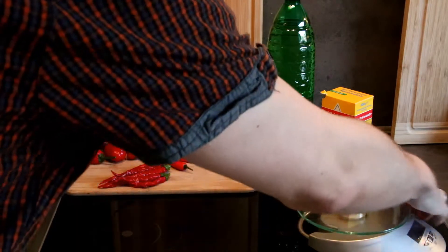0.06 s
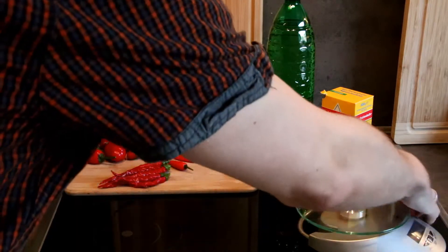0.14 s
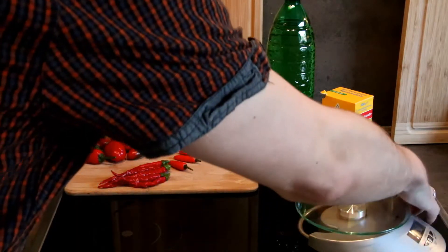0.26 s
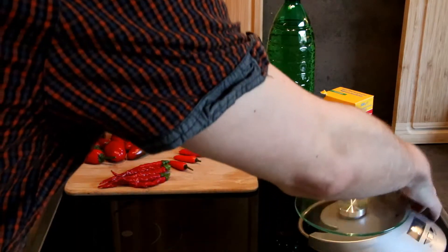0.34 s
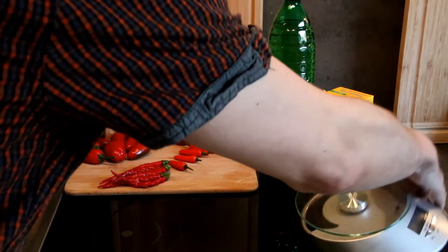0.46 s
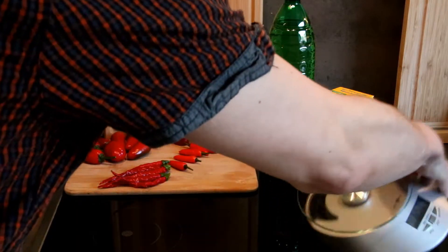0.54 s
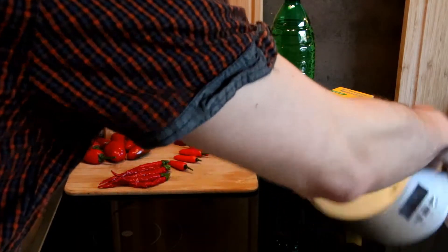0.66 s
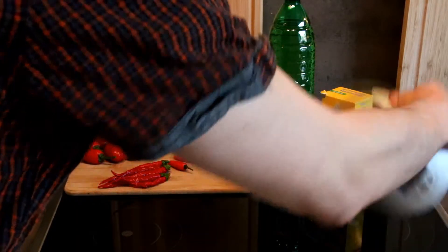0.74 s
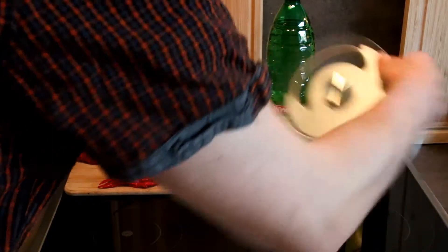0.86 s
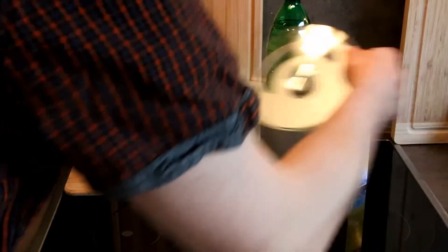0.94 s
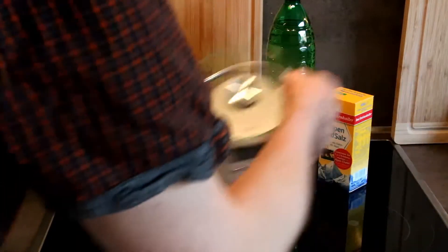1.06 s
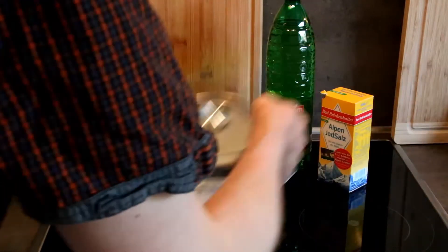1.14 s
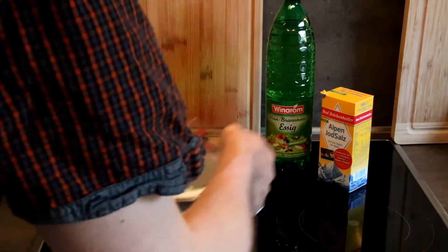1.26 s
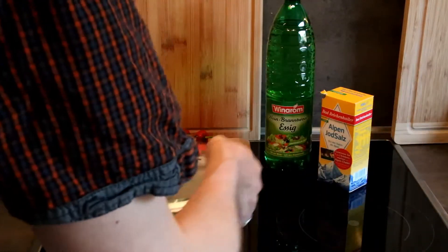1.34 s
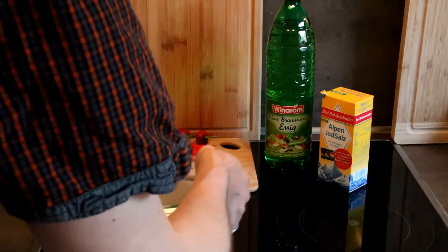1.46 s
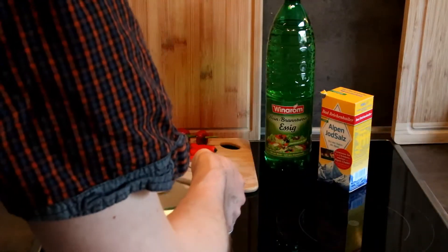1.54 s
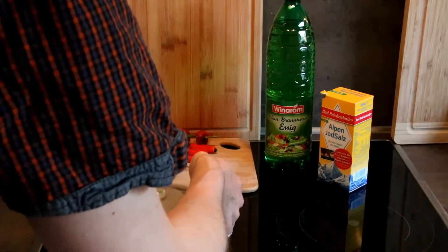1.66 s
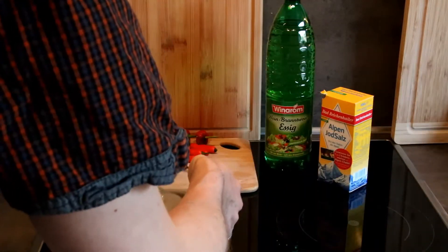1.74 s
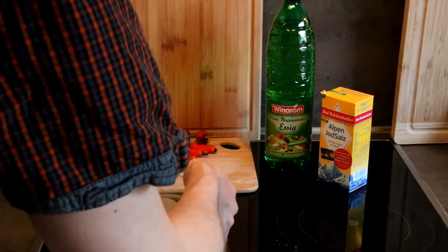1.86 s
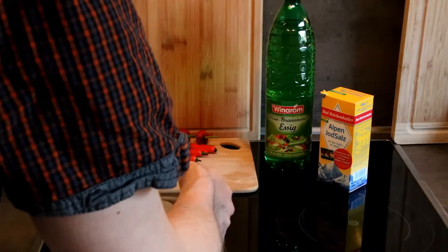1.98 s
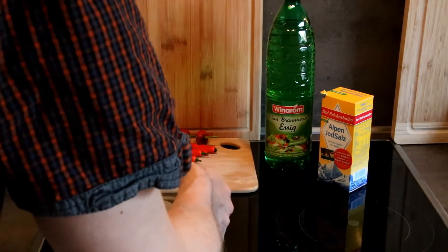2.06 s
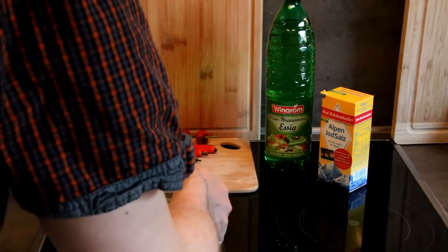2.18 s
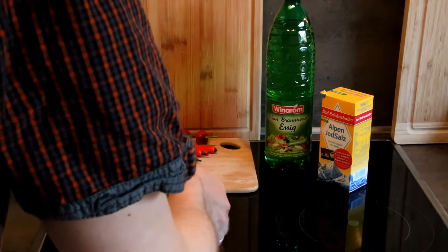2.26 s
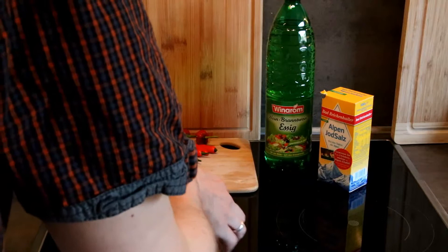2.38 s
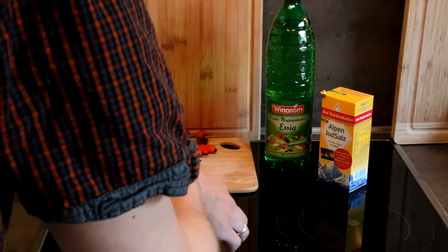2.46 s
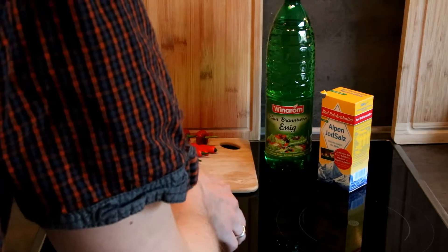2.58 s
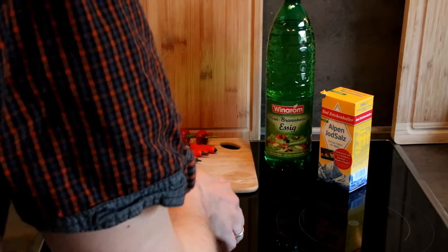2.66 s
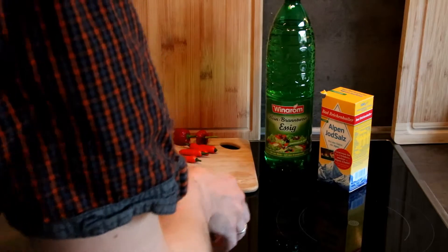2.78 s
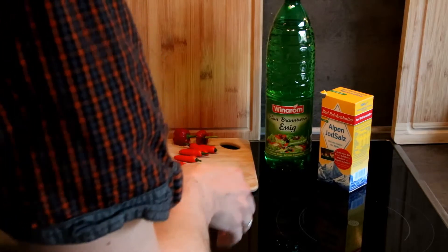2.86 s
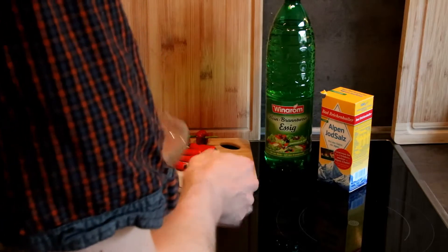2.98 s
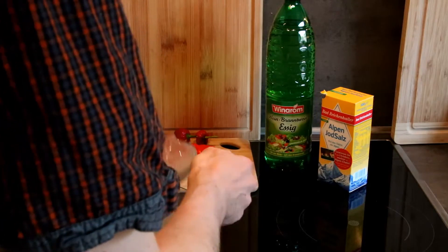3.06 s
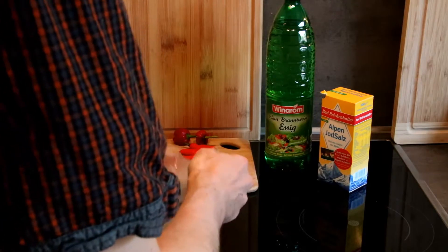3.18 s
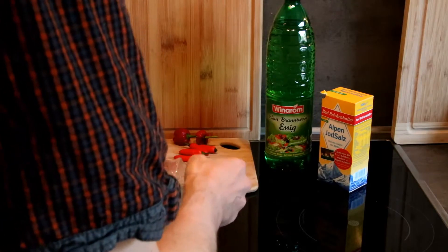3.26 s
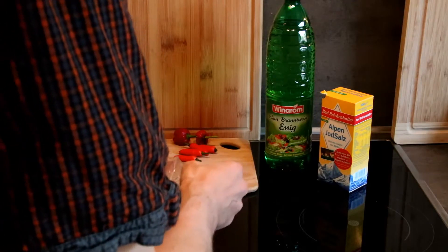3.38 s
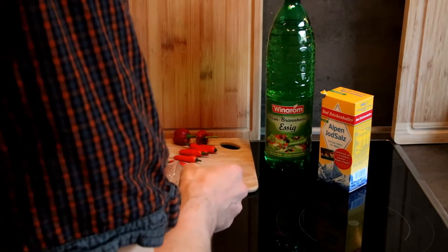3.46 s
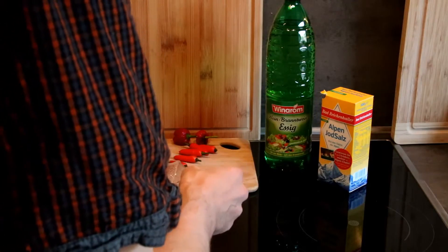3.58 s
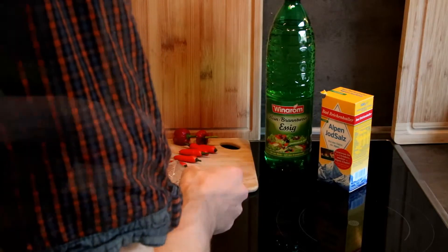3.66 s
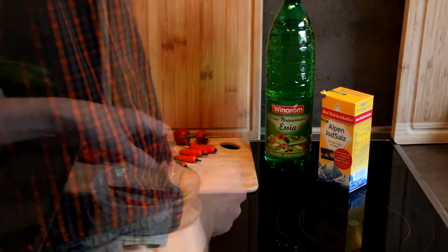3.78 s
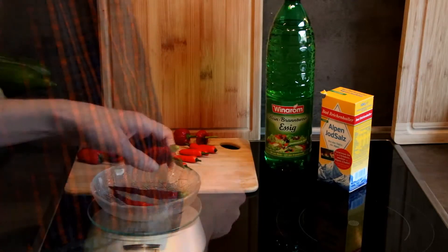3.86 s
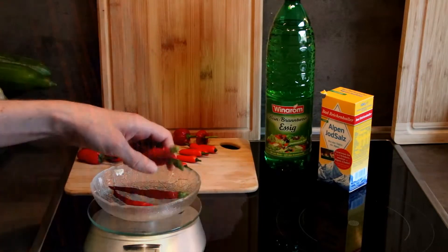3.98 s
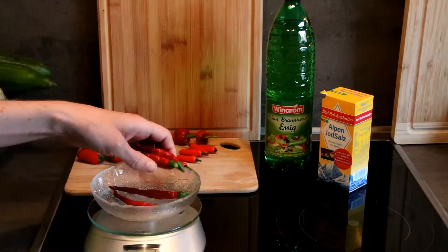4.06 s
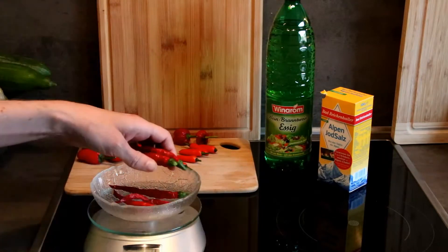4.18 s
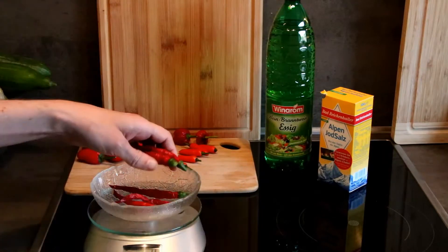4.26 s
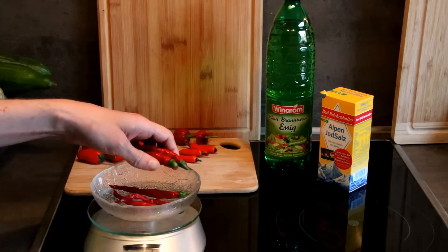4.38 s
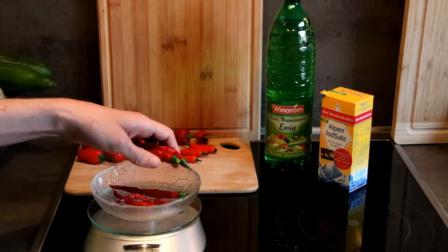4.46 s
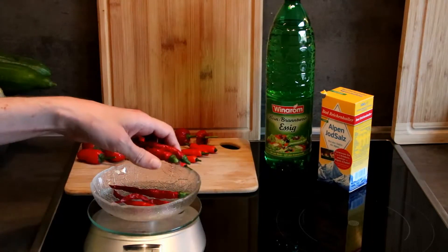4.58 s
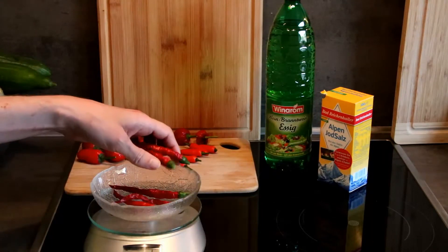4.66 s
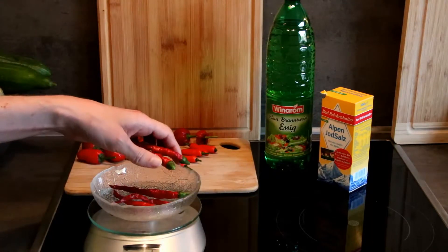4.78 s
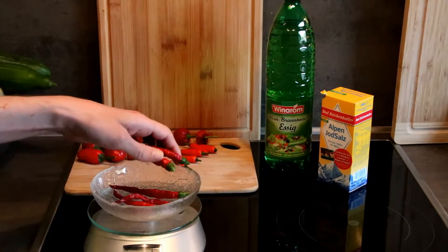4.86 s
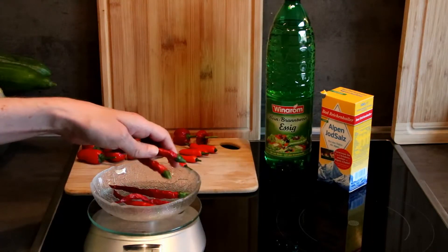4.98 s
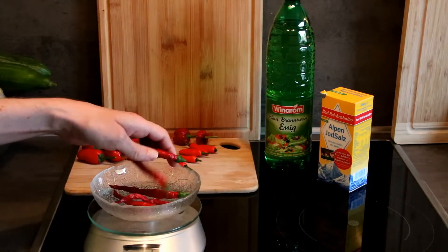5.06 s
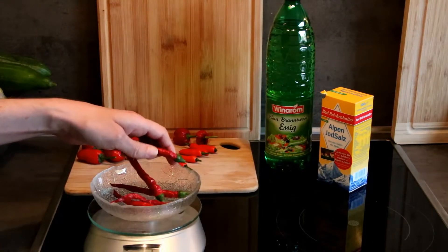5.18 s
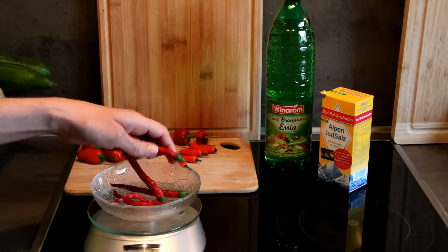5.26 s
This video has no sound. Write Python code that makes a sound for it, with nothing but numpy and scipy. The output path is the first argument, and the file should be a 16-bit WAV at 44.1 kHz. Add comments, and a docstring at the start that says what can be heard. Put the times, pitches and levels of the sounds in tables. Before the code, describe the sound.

Cloth brushes softly while a scale's glass plate clinks and its housing knocks. After a near-quiet gap it bumps and stutters across a glass hob, its last foot dropping with a sharp clack. About a second later a glass bowl hits the platter, the loudest sound, with quick lessening clinks. Then faint chili taps and finger rubs, heard close with a brief kitchen echo.

```python
"""A kitchen scale with a glass platter is lifted, carried over and set down on a glass hob, feet juddering.
A glass bowl clinks and rocks on the platter, then a fresh chili drops in among fainter taps and touches.
Blows ring decaying modes over a noise crack and a support thump; slips, scrapes and squeaks come from friction.
Cloth and fingers are coloured random grains; a small kitchen echoes briefly over a quiet hush."""
import sys
import numpy as np
from scipy import signal
from scipy.fft import rfft, irfft
from scipy.io import wavfile

SR = 44100
rng = np.random.default_rng(int(sys.argv[2]) if len(sys.argv) > 2 else 0)


def dump_mix(stems):
    """Bounce the given channels to the path in sys.argv[1] as a 16-bit WAV at rate SR."""
    frames = np.atleast_2d(stems).T  # one column per channel
    limited = np.clip(frames, -1, 1)  # hard clip at full scale
    pcm = np.round(limited * 32767).astype(np.int16)
    wavfile.write(sys.argv[1], SR, pcm)


N = 234727
TIME_S = np.arange(N) / SR
RING_TIME_S = TIME_S[:SR]

# Event tables; contact_hz is contact brightness, a low-pass cutoff
# arm movements brushing the sleeve over the shirt: peak_s, level_db, rise_s
SLEEVE_STROKES = [(0.081, -67.5, 0.42), (0.558, -60.5, 0.04), (.95, -61, 0.13), (1.241, -69.5, .07),
                  (2.0, -71, .15), (2.81, -58, 0.069), (2.96, -59, 0.068), (3.2, -69, .05),
                  (5.22, -72.5, .09)]
# platter knocks during handling: start_s, level_db, contact_hz, counter_thump_db
PLATTER_KNOCKS = [(.188, -53, 1470, -57), (.572, -32.5, 1170, -63), (.5975, -23, 8260, -47),
                  (.833, -42, 1240, -63), (1.020, -48.5, 7000, -63), (3.077, -46, 1410, -58)]
# dull low knocks of the housing while handled, then bumps on the hob:
# start_s, level_db, contact_hz, counter_thump_db
HOUSING_KNOCKS = [(.321, -41.5, 5500, -45.5), (.5365, -27, 2800, -49), (1.513, -57.5, 900, -71),
                  (1.659, -43, 3980, -77), (1.909, -34, 2400, -74), (2.068, -66, 600, -41.5),
                  (2.130, -29.5, 1500, -46), (2.523, -38.5, 696, -55), (2.541, -25, 470, -62.5)]
# shoves along the hob: fastest_s, level_db, speed_up_s, slow_down_s, contact_hz
SHOVES = [(1.9393, -23, 0.006, 0.009, 11200), (2.194, -34, 0.0078, 0.0054, 1900),
          (2.2137, -23, 0.0043, 0.018, 1950), (2.354, -40.5, 0.05, 0.011, 2080)]
# feet squeaking on the glass: peak_s, level_db, pitch_hz
SQUEAKS = [(1.966, -61.5, 9350), (2.188, -72, 9200), (2.22, -62, 6020), (2.22, -71, 9260),
           (2.258, -62, 6040)]
# the scale's last foot dropping onto the hob: start_s, level_db, contact_hz, counter_thump_db
LAST_FOOT = [(2.5465, -17.5, 13030, -28.5)]
# bowl landing on the platter and rocking to rest: start_s, level_db, contact_hz, load_cell_thump_db
BOWL_HITS = [(3.4785, -9, 13900, -19.5), (3.534, -25, 9000, -47), (3.558, -24.5, 5000, -50),
             (3.601, -22, 12700, -52.5), (3.668, -31.5, 590, -45.5), (3.714, -35, 12800, -50),
             (3.748, -40, 14000, -46)]
# a chili dropping into the bowl, and fainter taps and touches: start_s, level_db, stalk_contact_hz
CHILI_TAPS = [(4.046, -62, 8880), (4.1466, -39, 12000), (4.976, -62, 3000), (5.1363, -57, 4400)]
# fingers rolling a chili free: peak_s, level_db, rise_s, fall_s
FINGER_RUBS = [(4.813, -56, 0.0025, 0.033), (4.88, -63, 0.015, 0.054)]

# Modes of each struck body: mode_hz, level_db, t60_s
PLATTER_MODES = [(490, -17.5, 0.085), (560, -12.5, 0.092), (736, -11, 0.19), (1066, -17, 0.087),
                 (1206, -19.5, 0.25), (1926, -17, 0.078), (1994, -15.5, 0.12), (2250, -23.5, 0.053),
                 (2920, -35.5, 0.18), (3584, -37, 0.05)]
HOUSING_MODES = [(254, -24, 0.13), (338, -12, 0.065), (467.6, -3.5, 0.064), (592.5, -5.5, 0.088),
                 (726, -20, 0.12), (983, -40, 0.012), (1074, -23.5, 0.12), (1435, -18.5, 0.034),
                 (3700, -29, 0.074), (6000, -35, 0.057), (6250, -22.5, 0.04), (9330, -21, 0.043),
                 (10400, -27.5, 0.054), (12200, -34, .04)]
HOB_MODES = [(249.5, -13, 0.12), (336, -20, 0.33), (400, -8, 0.045), (496, -8, 0.099), (557, -11.5, 0.15),
             (940, -28, 0.15), (1000, -13, 0.062), (1629.4, -14.5, 0.064), (1930, -5.5, 0.05),
             (2400, -18, 0.048), (3860, -36, .08), (4900, -17, 0.052), (6200, -20.5, 0.12),
             (10700, -37, 0.18)]
BOWL_MODES = [(380, -13.5, 0.06), (486, -0.5, 0.094), (556, -18, 0.31), (704, -5, 0.12), (1449, -1, 0.066),
              (1468, -14, 0.2), (1620, -22.5, 0.37), (1690, -20, 0.14), (1816, -13.5, 0.076),
              (1980, -18.5, 0.028), (2340, -23, 0.35), (2992, -18, 0.027), (3575, -20, 0.082),
              (3840, -21.5, 0.066), (4020, -20, 0.098), (4300, -26.5, 0.23), (5440, -22.5, 0.094),
              (6400, -19.5, 0.079), (6614, -19.5, 0.057), (9485, -29.5, 0.18), (10250, -23.5, 0.11),
              (13000, -32.5, .13), (14030, -35.5, .12)]
FILLED_BOWL_MODES = [(484, -4, 0.13), (702, -7, 0.1), (995, -11.5, 0.3), (1210, -12, 0.12),
                     (2325, -13.5, 0.078), (3780, -23.5, 0.13), (4150, -15.5, 0.066), (5980, -21, 0.12),
                     (10696, -26, 0.15), (12200, -24, 0.09)]
# Modes of what gives way under a blow, the counter or the sprung load cell: mode_hz, level_db, t60_s
COUNTER_MODES = [(64, -9, 0.077), (88.7, -1.5, 0.0764), (105, -17.5, 0.73), (138.5, -9, 0.11)]
LOAD_CELL_MODES = [(30.2, 1, 0.052), (65, 1, 0.051), (102.6, -21.5, 0.94), (112, -8, 0.074)]

# Cracks, the crowded damped modes of each body: freq_hz, relative_density_db (per Hz)
PLATTER_CRACK = [(120, -4), (260, -16.5), (450, -0.5), (800, 4.5), (1100, -3), (1900, -5), (3000, -15.5),
                 (6500, -23.5), (11000, -29.5), (15000, -21)]
HOUSING_CRACK = [(100, -15.5), (220, -3), (450, 2), (1000, -1), (1600, -13.5), (2600, -22.5), (6000, -29),
                 (9000, -36.5), (15000, -38)]
HOB_CRACK = [(60, 5), (150, -3.5), (450, 1.5), (750, -16.5), (1100, 0), (2000, -4), (3000, -9.5),
             (6000, -12.5), (8000, -19.5), (12000, -29), (15500, -34.5)]
BOWL_CRACK = [(120, -14.5), (220, -19.5), (420, -3.5), (650, -1.5), (850, -9), (1150, -5.5), (1600, -5.5),
              (2600, -17), (3800, -7.5), (4700, -24), (6500, -17), (8500, -30), (15000, -40)]
CHILI_CRACK = [(120, -4), (500, -1.5), (1100, 1), (1600, -6.5), (4000, -9), (7000, -13), (10000, -18.5),
               (15000, -27)]
# Spectra of the quiet kitchen, sleeve and fingers: freq_hz, relative_density_db (per Hz)
HUSH_COLOUR = [(35, -19), (100, -8.5), (200, -10.5), (280, -5), (420, -11), (900, -13.5), (2850, -24),
               (3830, -28), (11800, -37), (15000, -56.5)]
SLEEVE_COLOUR = [(60, -3), (250, -0.5), (550, 0.5), (1200, -6.5), (2500, -10), (4500, -18), (7000, -25.5),
                 (11000, -30.5), (15000, -38)]
FINGER_COLOUR = [(60, -25), (250, 1.5), (400, -5), (800, -8.5), (1200, -18.5), (3200, -25.5), (4000, -34.5),
                 (12000, -55), (15500, -65)]
# Kitchen echo: freq_hz, t60_s, level_db
KITCHEN_ECHO = [(100, 0.2, -2.5), (280, 0.81, -7), (502, 0.38, -8.5), (1407, 0.65, -9.5),
                (3270, 0.57, -5.5), (6200, 0.31, -6), (14000, 0.36, -11)]

HUSH_DB = -70
SLIP_EVERY_S, SLIP_JITTER_S = .0095, 0.00041
SLIP_THUMP_DB = -25.5   # re each slip
SCRAPE_RING_DB, SCRAPE_GRIT_DB = -14, -13.5   # re the shove level
SCRAPE_RING_HZ = 5000   # low-pass cutoff
SCRAPE_LONGER = 1.27   # scrape rise and fall times, as a multiple of the shove's
SQUEAK_RISE_S, SQUEAK_FALL_S, SQUEAK_WIDTH_HZ = 0.0092, 0.0067, 170
FLESH_BRIGHTNESS = 0.15   # share of the stalk's contact_hz
STALK_AFTER_S, STALK_DB = .0115, -2   # re the flesh contact
BOUNCE_AFTER_S, BOUNCE_DB = .0465, -8.5   # re the flesh contact
POD_THUMP_DB = -10.5   # re each contact
DIP_S, DIP_DB, DIP_SINK_S, DIP_RECOVER_S = 4.0, -7, 0.052, 0.076
MICROPHONE_LOW_HZ, CUTOFF_HZ = 30.1, 15700


def from_db(db):
    """Decibels to gain."""
    return 10 ** (np.asarray(db) / 20)


def rms_one(x):
    """Scale to unit power."""
    return x / np.sqrt(np.mean(x ** 2))


def at_hz(rows, hz, axis=1):
    """Read one table column, interpolated over log frequency."""
    rows = np.array(rows)
    return np.interp(np.log(hz + 1), np.log(rows[:, 0]), rows[:, axis])


def coloured(x, spectrum):
    """Give a steady signal a spectrum, rolled off in the deepest bass; rms 1."""
    hz = np.arange(len(x) // 2 + 1) * SR / len(x)
    bass_cut = hz ** 2 / (hz ** 2 + spectrum[0][0] ** 2 / 2)
    return rms_one(irfft(rfft(x) * from_db(at_hz(spectrum, hz)) * bass_cut, len(x)))


def low_pass(x, hz):
    """Take out treble, as a soft contact does to a blow."""
    sos = signal.butter(2, np.clip(hz, 20, .45 * SR), fs=SR, output="sos")
    return signal.sosfilt(sos, x + 1e-18)


def high_pass(x, hz):
    """Take out bass, as a small body radiates little of it."""
    return signal.sosfilt(signal.butter(2, hz, "high", fs=SR, output="sos"), x + 1e-18)


def band_pass(x, low_hz, high_hz):
    """Keep one frequency band."""
    return signal.sosfilt(signal.butter(2, [low_hz, high_hz], "band", fs=SR, output="sos"), x)


def swell(peak_s, level_db, rise_s, fall_s, time_s=TIME_S):
    """Gain of one movement: rounded top at peak_s; rise and fall are time constants."""
    away = np.abs(time_s - peak_s) / np.where(time_s < peak_s, rise_s, fall_s)
    return from_db(level_db) / np.cosh(np.minimum(away, 50))   # limit avoids overflow


def grains(per_s, spread_db):
    """Tiny random slips of uneven size and either sign; rms 1."""
    occurs = rng.random(N) < per_s / SR
    sign = rng.choice([-1, 1], N)
    size = from_db(spread_db * np.clip(rng.standard_normal(N), -2, 2))
    return rms_one(occurs * sign * size)


def ringing(modes):
    """All modes struck at once; little is radiated below the lowest one."""
    ring = np.zeros(SR)
    for k, (hz, level_db, t60_s) in enumerate(modes):
        decay = from_db(level_db - 60 * RING_TIME_S / t60_s)
        ring += (-1) ** k * decay * np.sin(2 * np.pi * hz * RING_TIME_S)
    return high_pass(ring, modes[0][0] / 2)


def split_ringing(modes, split, twin_db, vary_db):
    """Each mode has close twins whose pitch depends on how the body rests, so the ring beats unevenly."""
    out = np.zeros(SR)
    for k, (hz, level_db, t60_s) in enumerate(modes):
        t = RING_TIME_S[:round(1.3 * t60_s * SR)]
        detune = split * rng.standard_normal((3, 1))
        phase = rng.uniform(0, 2 * np.pi, (3, 1))
        main = (-1) ** k * np.sin(2 * np.pi * hz * t)
        twins = np.sin(2 * np.pi * hz * (1 + detune) * t + phase).sum(axis=0)
        twin_gain = from_db(twin_db) * np.sqrt(hz / (hz + 1000))   # weaker at low pitch
        decay = from_db(level_db + vary_db * rng.standard_normal() - 60 * t / t60_s)
        out[:len(t)] += decay * (main + twin_gain * twins)
    return out


def add(out, start_s, sound):
    """Mix a sound in at start_s."""
    start = round(start_s * SR)
    out[start:start + len(sound)] += sound[:N - start]


def blows(hits, modes, crack, support, crack_db, crack_t60_s, rise_s, twin_db, edge_db):
    """Each blow rings the modes with strengths of its own, over a short crack, and thumps the support."""
    out, thump = np.zeros(N), ringing(support)
    # each blow swells in over a few milliseconds, as early reflections arrive
    swell_in = 1 - np.exp(-(RING_TIME_S / rise_s) ** 2)
    crack_decay = from_db(crack_db - 60 * RING_TIME_S / crack_t60_s)
    for start_s, level_db, contact_hz, thump_db in hits:
        tone = split_ringing(modes, split=.02, twin_db=twin_db, vary_db=1.4)
        burst = coloured(rng.standard_normal(SR), crack) * crack_decay
        body = low_pass(swell_in * (tone + burst), contact_hz)
        edge = from_db(edge_db) * low_pass(swell_in * burst, 5800)   # even a soft contact has a hard edge
        radiated = high_pass(body - edge, 90)
        add(out, start_s, from_db(level_db) * radiated + from_db(thump_db) * thump)
    return out


def hush():
    """Quiet kitchen: steady coloured noise."""
    return from_db(HUSH_DB) * coloured(rng.standard_normal(N), HUSH_COLOUR)


def sleeve():
    """Threads of cloth catch on each other with every stroke of the arm; strokes add in power."""
    power = sum(swell(peak_s, level_db, rise_s, rise_s) ** 2 for peak_s, level_db, rise_s in SLEEVE_STROKES)
    return np.sqrt(power) * coloured(grains(per_s=6500, spread_db=3.5), SLEEVE_COLOUR)


def kitchen_echo(x, build_s):
    """Diffuse echo that builds up, then dies away at its own rate in each band."""
    edges_hz, echo = np.geomspace(45, 17000, 10), np.zeros(SR)
    build = 1 - np.exp(-(RING_TIME_S / build_s) ** 2)
    for low_hz, high_hz in zip(edges_hz, edges_hz[1:]):
        hz = np.sqrt(low_hz * high_hz)
        decay = from_db(-60 * RING_TIME_S / at_hz(KITCHEN_ECHO, hz))
        band = band_pass(rng.standard_normal(SR), low_hz, high_hz) * decay * build
        band_gain = from_db(at_hz(KITCHEN_ECHO, hz, axis=2)) * np.sqrt(2 * (high_hz - low_hz)) / SR
        echo += band_gain * rms_one(band)
    return signal.fftconvolve(x, echo)[:N]


def platter_knocks():
    """The glass platter knocks as the scale is handled."""
    return blows(PLATTER_KNOCKS, PLATTER_MODES, PLATTER_CRACK, COUNTER_MODES,
                 crack_db=-2.5, crack_t60_s=0.066, rise_s=0.0031, twin_db=-5, edge_db=-18.0)


def judder(count=8):
    """Stick and slip: the faster the shove, the stronger and brighter the slip; returns blow rows."""
    slips = []
    for fastest_s, level_db, rise_s, fall_s, contact_hz in SHOVES:
        even_s = SLIP_EVERY_S * (np.arange(count) - count // 2 + 1)
        times_s = fastest_s + even_s + SLIP_JITTER_S * rng.standard_normal(count)
        speeds = swell(fastest_s, 0, rise_s, fall_s, times_s)   # re the fastest
        for slip_s, speed in zip(times_s, speeds):
            slip_db = level_db + 20 * np.log10(speed)
            slips.append((slip_s, slip_db, contact_hz * np.sqrt(speed), slip_db + SLIP_THUMP_DB))
    return slips


def housing_knocks():
    """Dull low knocks of the housing while handled, then bumps on the hob and juddering slips of the feet."""
    return blows(HOUSING_KNOCKS + judder(), HOUSING_MODES, HOUSING_CRACK, COUNTER_MODES,
                 crack_db=-1.5, crack_t60_s=.05, rise_s=0.0025, twin_db=-5.5, edge_db=-14)


def scrape():
    """The sliding feet grind over the hob and keep the housing ringing."""
    sliding = sum(swell(fastest_s, level_db, SCRAPE_LONGER * rise_s, SCRAPE_LONGER * fall_s)
                  for fastest_s, level_db, rise_s, fall_s, _ in SHOVES)
    driven = signal.fftconvolve(grains(per_s=290, spread_db=13.5), ringing(HOUSING_MODES))[:N]
    ring = rms_one(low_pass(driven, SCRAPE_RING_HZ))
    grit = coloured(grains(per_s=7200, spread_db=11.5), HOUSING_CRACK)
    return sliding * (from_db(SCRAPE_RING_DB) * ring + from_db(SCRAPE_GRIT_DB) * grit)


def squeaks():
    """Friction briefly excites one narrow, high resonance: band-passed noise."""
    out = np.zeros(N)
    for peak_s, level_db, hz in SQUEAKS:
        tone = band_pass(rng.standard_normal(N), hz - SQUEAK_WIDTH_HZ / 2, hz + SQUEAK_WIDTH_HZ / 2)
        out += swell(peak_s, level_db, SQUEAK_RISE_S, SQUEAK_FALL_S) * rms_one(tone)
    return out


def last_foot():
    """The scale's last foot drops onto the hob and rings its glass."""
    return blows(LAST_FOOT, HOB_MODES, HOB_CRACK, COUNTER_MODES,
                 crack_db=-4.5, crack_t60_s=0.069, rise_s=0.0013, twin_db=-4.5, edge_db=-30.5)


def bowl():
    """Glass meets glass, then rocks; the load cell gives way."""
    return blows(BOWL_HITS, BOWL_MODES, BOWL_CRACK, LOAD_CELL_MODES,
                 crack_db=-0.5, crack_t60_s=0.058, rise_s=0.0028, twin_db=-3.5, edge_db=-31)


def chili_taps():
    """A chili drop and fainter touches: each taps with soft flesh, then the hard stalk, and bounces once."""
    # after_s, relative_db, brightness share
    contacts = ((0, 0, FLESH_BRIGHTNESS), (STALK_AFTER_S, STALK_DB, 1), (BOUNCE_AFTER_S, BOUNCE_DB, 1))
    taps = []
    for start_s, level_db, contact_hz in CHILI_TAPS:
        for after_s, relative_db, brightness in contacts:
            tap_db = level_db + relative_db
            taps.append((start_s + after_s, tap_db, contact_hz * brightness, tap_db + POD_THUMP_DB))
    return blows(taps, FILLED_BOWL_MODES, CHILI_CRACK, COUNTER_MODES,
                 crack_db=0.0, crack_t60_s=0.082, rise_s=0.00045, twin_db=-1.5, edge_db=-46.0)


def finger_rubs():
    """Skin slips in tiny grains as the fingers roll a chili free."""
    rubbing = sum(swell(*rub) for rub in FINGER_RUBS)
    return rubbing * coloured(grains(per_s=1100, spread_db=2.5), FINGER_COLOUR)


def scene():
    """Handling and its echo, dipping briefly as the bowl dies away, over the steady hush."""
    scale = platter_knocks() + housing_knocks() + scrape() + squeaks() + last_foot()
    near = sleeve() + scale + bowl() + chili_taps() + finger_rubs()
    dip = from_db(DIP_DB * swell(DIP_S, 0, DIP_SINK_S, DIP_RECOVER_S))
    return (dip * (near + kitchen_echo(near, build_s=0.0099)) + hush())[None]


def record(dry):
    """The microphone drops the deepest bass; the top is cut steeply."""
    heard = signal.sosfilt(signal.butter(2, MICROPHONE_LOW_HZ, "high", fs=SR, output="sos"), dry)
    return signal.sosfilt(signal.ellip(10, .1, 80, CUTOFF_HZ, fs=SR, output="sos"), heard)


dry = scene()
out = record(dry)
dump_mix(out)
```